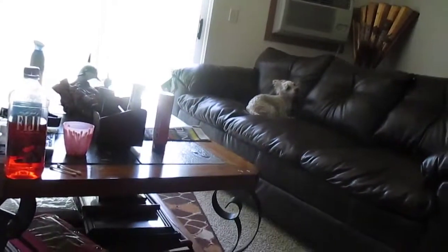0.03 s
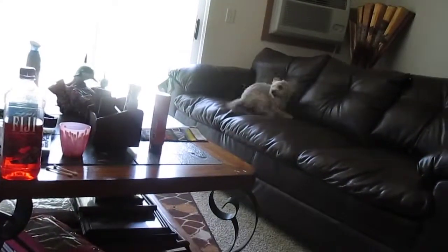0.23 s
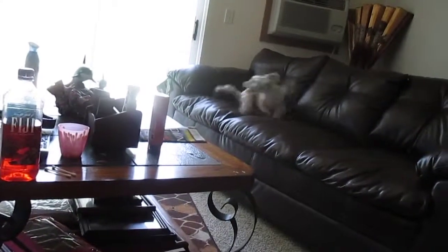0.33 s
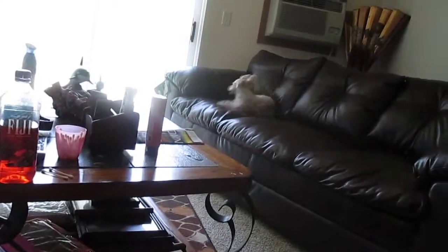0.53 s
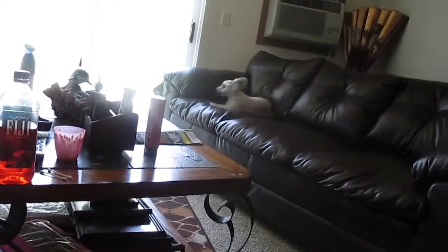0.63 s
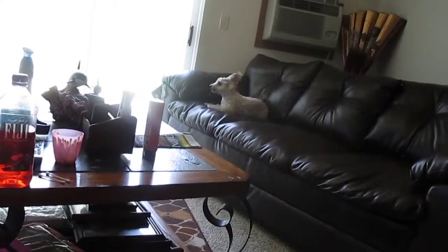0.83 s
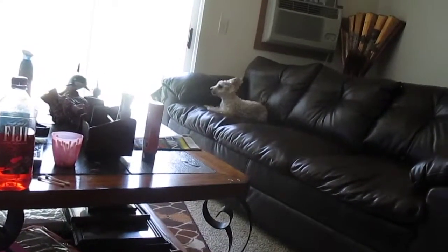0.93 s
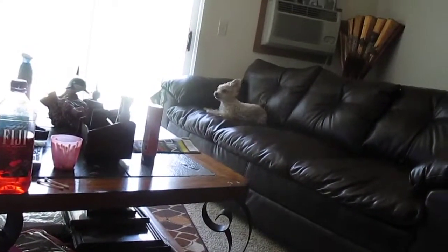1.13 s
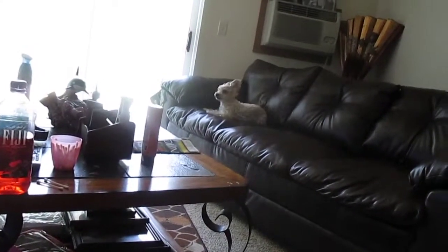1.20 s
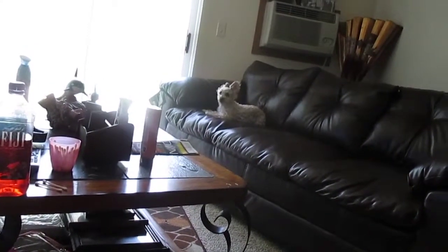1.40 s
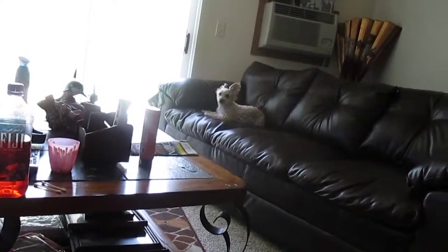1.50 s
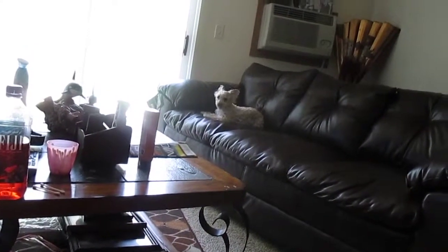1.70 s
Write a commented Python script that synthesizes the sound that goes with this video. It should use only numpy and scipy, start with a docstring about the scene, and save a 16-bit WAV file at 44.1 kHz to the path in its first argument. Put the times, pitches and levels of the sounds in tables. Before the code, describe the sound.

A dog scrambling on a leather couch, with rustles and soft thumps over an appliance hum.

```python
"""A small dog whirls round on a leather couch and lies down, a few metres away in a living room.
Its paws slap the leather and drive the damped modes of the cushions, while its weight rocks the seat.
Its body slides over the leather with stick-slip friction, heard as a rustle and brief squeaks.
The room adds a short reverberation. Behind it an appliance hums steadily, with a thin electrical whine."""
import sys
import numpy as np
from scipy import signal
from scipy.fft import rfft, irfft
from scipy.io import wavfile

SR = 44100
rng = np.random.default_rng(int(sys.argv[2]) if len(sys.argv) > 2 else 0)


def digitize_waveform(pressure):
    """Quantize a signal to 16-bit integers and store it at the path in sys.argv[1].

    Rows of a 2-D input are taken as channels; values are limited to [-1, 1].
    """
    field = np.atleast_2d(pressure).T
    bounded = np.clip(field, -1, 1)
    quanta = np.round(bounded * 32767).astype(np.int16)
    wavfile.write(sys.argv[1], SR, quanta)


N = 77175
TIME = np.arange(N) / SR


def from_db(db):
    """Amplitude ratio of a level in decibels."""
    return 10 ** (np.asarray(db) / 20)


def rms_one(x):
    """Normalisation to an rms of 1."""
    return x / np.sqrt(np.mean(x ** 2) + 1e-20)


def colour(x, spectrum, tilt_db=0):
    """Minimum-phase filtering to a spectral envelope, tilted by tilt_db per octave; the rms is 1."""
    size = 2 * N
    hz, db = np.transpose(spectrum)
    octave = np.log2(np.maximum(np.fft.rfftfreq(size, 1 / SR), 1))
    above_lowest = octave - np.log2(hz[0])
    shape_db = np.interp(octave, np.log2(hz), db) + tilt_db * np.maximum(above_lowest, 0)
    shape_db += 12 * np.minimum(above_lowest, 0)  # bass roll-off, 12 dB per octave
    cepstrum = irfft(np.log(from_db(shape_db)))
    cepstrum[1:N] *= 2  # folding the cepstrum makes the filter causal
    cepstrum[N + 1:] = 0
    return rms_one(irfft(rfft(x, size) * np.exp(rfft(cepstrum)))[:N])


def drift(rate_hz):
    """Random fluctuation: noise low-passed at rate_hz, with an rms of 1."""
    pole = np.exp(-2 * np.pi * rate_hz / SR)
    return rms_one(signal.lfilter([1], [1, -2 * pole, pole * pole], rng.standard_normal(2 * N))[N:])


def decay(start, t60, attack_s=0.00086):
    """Exponential decay after a quick rise, falling 60 dB in t60 seconds."""
    age = np.clip(TIME - start, 0, 4 * t60)
    return np.tanh(age / attack_s) ** 2 * np.exp(-np.log(1000) * age / t60)


def push(start, contact_ms):
    """Soft impact: a force pulse of unit sum; longer contact excites less treble."""
    age = np.clip((TIME - start) * 5000 / contact_ms, 0, 60)  # five time constants per contact
    force = age ** 2 * np.exp(-age)
    return force / force.sum()


def ring(force, modes):
    """Modal superposition: each mode answers the force as a damped oscillator."""
    out = 0
    for hz, db, t60 in modes:
        radius = np.exp(-np.log(1000) / (t60 * SR))
        pole_real = radius * np.cos(2 * np.pi * hz / SR)
        mode = signal.lfilter([1, -pole_real], [1, -2 * pole_real, radius ** 2], force + 1e-18)
        out = out + from_db(db) * mode
    return out


def appliance(waver_depth=0.042, waver_hz=9.3, air_db=-48):
    """Tones under slight random amplitude and phase modulation, over the broadband noise of moving air."""
    # The hum's tones. Each row: frequency in Hz, rms level in dB.
    hum_tones = [(69.5, -49), (172.2, -51.5), (624.5, -61.5), (4915, -81.5), (7870, -89)]
    # The spectrum of moving air. Each row: frequency in Hz, relative spectral density in dB.
    air_spectrum = [(22, -7.5), (38, 8.5), (58, 4), (82, -7), (116, 7.5), (145, -2.5), (185, -2),
                    (265, -5.5), (310, 2.5), (350, -8.5), (410, -0.5), (460, -5), (540, -4), (690, -5.5),
                    (800, -8), (1000, -9.5), (1500, -16.5), (2000, -20.5), (2600, -23.5), (4200, -28.5),
                    (5700, -30.5), (8000, -37), (9800, -40), (10500, -43.5), (12500, -45), (15500, -50)]
    hum = 0
    for hz, db in hum_tones:
        waver = 1 + waver_depth * (drift(waver_hz) + 1j * drift(waver_hz))
        carrier = np.exp(2j * np.pi * (hz * TIME + rng.random()))
        hum = hum + from_db(db) * np.sqrt(2) * np.real(waver * carrier)
    return hum + from_db(air_db) * colour(rng.standard_normal(N), air_spectrum)


def whine(pitch_hz=11800, dip_hz=348, mains_hz=60, level_db=-85.5):
    """Frequency modulation: a thin electrical tone dips in pitch once in every mains cycle."""
    dip = np.sin(np.pi * mains_hz * TIME) ** 8
    phase = 2 * np.pi * np.cumsum(pitch_hz - dip_hz * dip) / SR
    return from_db(level_db) * np.sqrt(2) * np.sin(phase)


def room(x, t60=0.39, gain_db=-8.5, delay_s=0.0051):
    """Diffuse reverberation: convolution with decaying noise stands for a furnished room's reflections."""
    tail = rng.standard_normal(N) * decay(delay_s, t60)
    tail /= np.sqrt(np.sum(tail ** 2))
    return from_db(gain_db) * signal.fftconvolve(x, tail)[:N]


def seat():
    """Impulse response: shifts of the dog's weight excite the low modes of the springs and frame."""
    # Shifts of weight. Each row: start in seconds, impulse level in dB.
    heaves = [(0.224, -44), (0.301, -28.5), (0.347, -33), (0.491, -37), (0.544, -39), (.622, -32)]
    # The seat's modes. Each row: frequency in Hz, gain in dB, 60 dB decay time in seconds.
    seat_modes = [(44.2, -3.5, 0.38), (50.4, -3.5, 0.3), (89.4, 3.5, 0.18)]
    force = sum(from_db(db) * push(start, contact_ms=5.2) for start, db in heaves)
    return ring(force, seat_modes)


def squeaks(jitter_rad=0.43, jitter_hz=270):
    """Stick-slip oscillation of the leather gives short tones, roughened by phase jitter."""
    # Squeaks. Each row: centre in seconds, pitch in Hz, peak rms level in dB, Gaussian width in seconds.
    bursts = [(.233, 5000, -43, 0.0031), (.485, 1800, -31.5, 0.0018)]
    out = 0
    for centre, hz, db, width in bursts:
        envelope = from_db(db) * np.exp(-0.5 * ((TIME - centre) / width) ** 2)
        phase = 2 * np.pi * hz * TIME + jitter_rad * drift(jitter_hz)
        out = out + envelope * np.sqrt(2) * np.sin(phase)
    return out


def friction(slips_per_s=4000, spread_db=1, fur_gain=0.71):
    """Friction noise: a Poisson train of tiny, uneven slips over the smooth hiss of fur."""
    sizes = from_db(spread_db * np.minimum(rng.exponential(1, N), 4))
    signs = rng.choice([-1, 1], N)
    slips = sizes * signs * (rng.random(N) < slips_per_s / SR)
    return rms_one(slips) + fur_gain * rng.standard_normal(N)


def slides(rough_db=0.75):
    """Sliding friction of fur and paws on leather: each stroke swells and fades, catching unevenly."""
    # Strokes. Each row: peak time in seconds, peak level in dB, times to rise and to fall
    # by 20 dB in seconds, spectral tilt in dB per octave.
    strokes = [(.176, -42.5, 0.032, 0.14, 0.4), (0.235, -27.5, 0.049, 0.034, -0.33),
               (.255, -31, 0.024, 0.019, -1.5), (.280, -40.5, 0.043, 0.046, 0),
               (.305, -34, 0.017, 0.069, 0.5), (.372, -34.5, 0.11, 0.057, -0.2),
               (0.438, -27, 0.06, 0.037, 0.94), (0.482, -33, .022, 0.036, -0.3),
               (0.551, -37, 0.1, 0.066, 0), (0.614, -34.5, 0.04, 0.046, -1.5),
               (0.643, -52, 0.095, 0.059, 5.5), (0.693, -43.5, 0.088, 0.13, 1.0)]
    # The spectrum of rubbed leather. Each row: frequency in Hz, relative spectral density in dB.
    leather_spectrum = [(70, 5.5), (130, 2), (250, 8), (420, 4), (600, 4.5), (900, 3), (1300, -0.5),
                        (2100, -1.5), (2700, -8.5), (3600, -14.5), (5000, -16.5), (7000, -20.5),
                        (10000, -29), (12500, -39), (16000, -42)]
    rub = friction() * from_db(rough_db * drift(rate_hz=30))
    out = 0
    for peak, db, rise, fall, tilt_db in strokes:
        swell_db = -20 * np.maximum((peak - TIME) / rise, (TIME - peak) / fall)
        out = out + from_db(db + swell_db) * colour(rub, leather_spectrum, tilt_db)
    return out


def paws(slap_t60=0.084, slap_gain_db=1, rough_db=1):
    """Impact excitation: each landing rings the cushion's modes and slaps noise from its leather skin."""
    # Landings. Each row: start in seconds, relative thump and slap levels in dB, contact time in ms.
    landings = [(0.225, -26.5, -24.5, 1.24), (0.2525, -31, -35, 1.1), (.2950, -10.5, -24, 1.92),
                (.3055, -9.5, -36, 1.68), (0.3355, -22.5, -40, 1.43), (.369, -20, -34, 2.7),
                (.5160, -12.5, -35, 4.46), (0.5234, -18, -39.5, 4.5), (0.549, -30.5, -39.5, 1.05),
                (0.5626, -23.5, -59, 3.5), (.604, -34, -40.5, 1.3), (.6150, -30.5, -39, 1.28),
                (.6250, -30, -60, 1.1)]
    # The cushion's modes. Each row: frequency in Hz, gain in dB, 60 dB decay time in seconds.
    cushion_modes = [(105.3, -43, 0.57), (142.2, -7, .16), (226.4, -15.5, 0.23), (297, -8, 0.041),
                     (325.6, 0, 0.071), (412.1, 0.5, 0.1), (565, -2.5, 0.045), (733, -9, 0.055)]
    # The spectrum of a slap. Each row: frequency in Hz, relative spectral density in dB.
    slap_spectrum = [(150, -16), (400, 9), (1000, 1), (1400, -0.5), (2100, -0.5), (3300, -9.5),
                     (5000, -19.5), (9000, -28.5), (15000, -41.5)]
    force = sum(from_db(db) * push(start, contact_ms) for start, db, _, contact_ms in landings)
    thumps = -ring(force, cushion_modes)
    slap_envelope = sum(from_db(db + slap_gain_db) * decay(start, slap_t60) for start, _, db, _ in landings)
    slap_noise = friction() * from_db(rough_db * drift(rate_hz=145))
    return thumps + slap_envelope * colour(slap_noise, slap_spectrum)


def scene():
    """Superposition in one channel of the dog, its reverberation, the seat and the background."""
    dog = paws() + slides() + squeaks()
    return (dog + room(dog) + seat() + appliance() + whine())[None]


def record(dry, cutoff_hz=15750):
    """An elliptic low-pass filter cuts the highest treble steeply."""
    return signal.sosfilt(signal.ellip(12, 0.2, 80, cutoff_hz, fs=SR, output="sos"), dry)


dry = scene()
out = record(dry)
digitize_waveform(out)
```